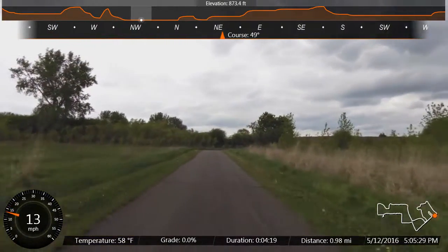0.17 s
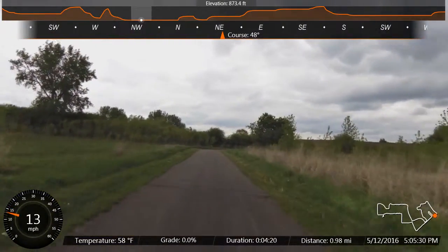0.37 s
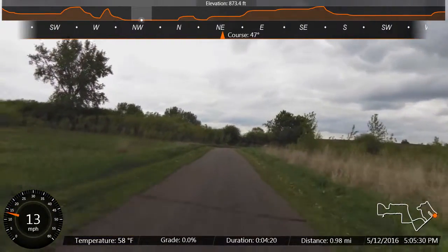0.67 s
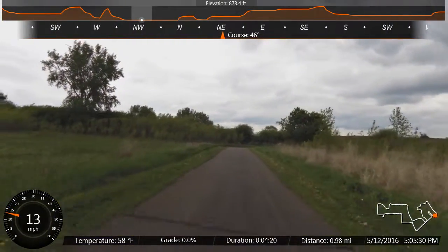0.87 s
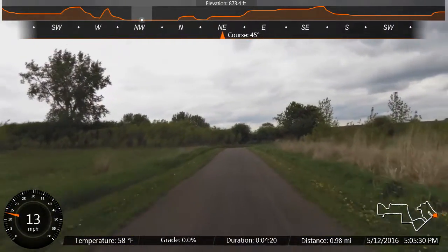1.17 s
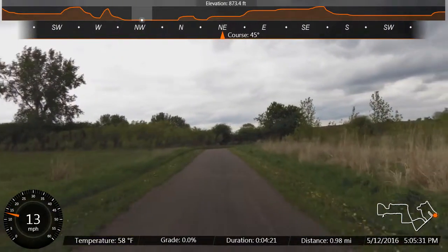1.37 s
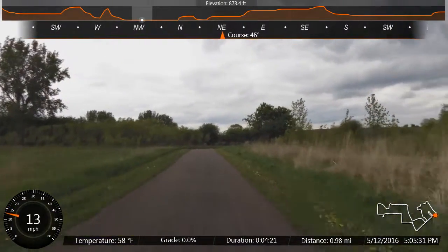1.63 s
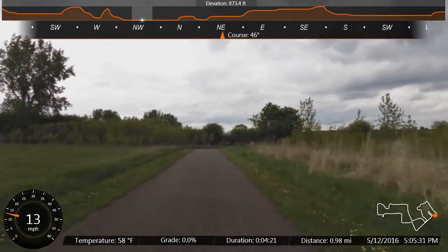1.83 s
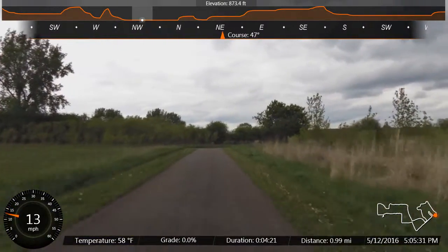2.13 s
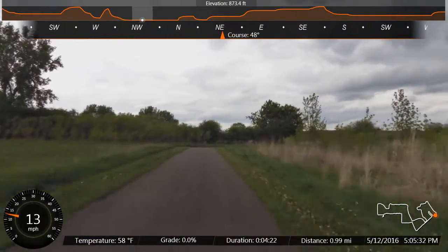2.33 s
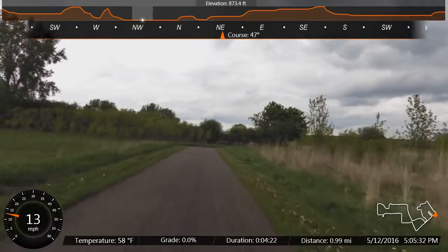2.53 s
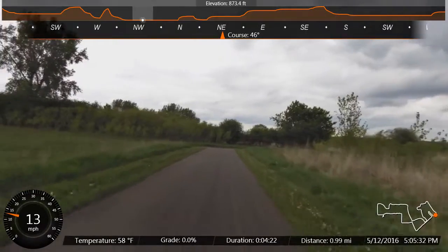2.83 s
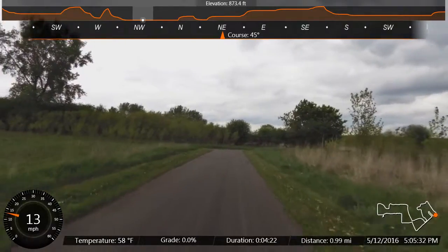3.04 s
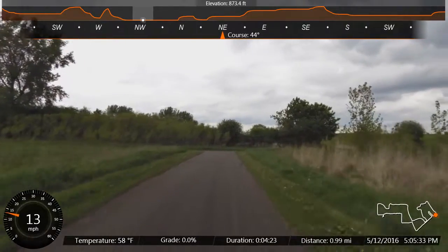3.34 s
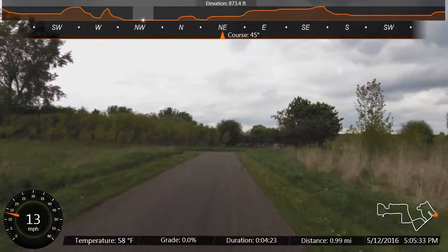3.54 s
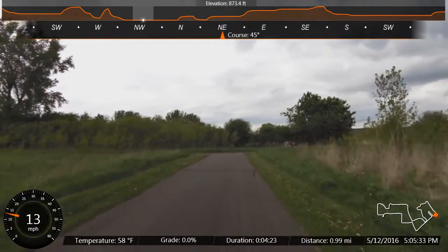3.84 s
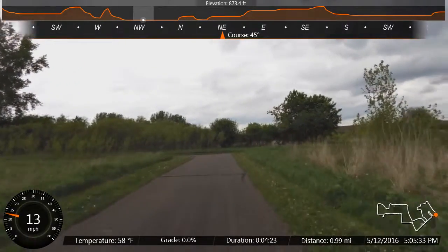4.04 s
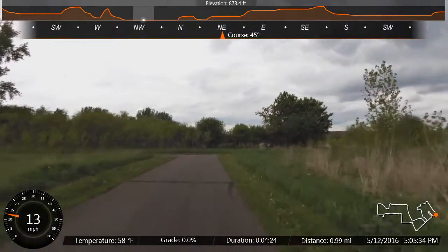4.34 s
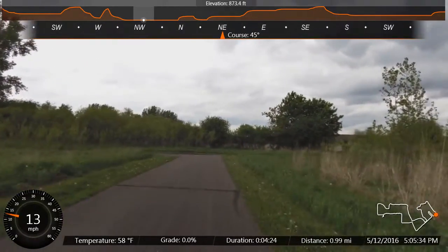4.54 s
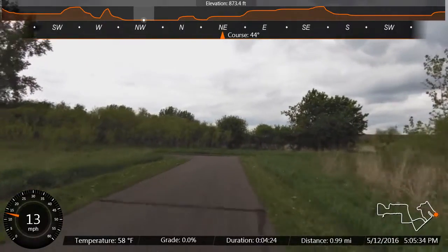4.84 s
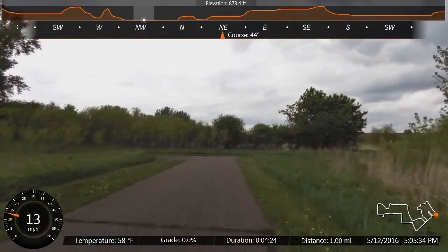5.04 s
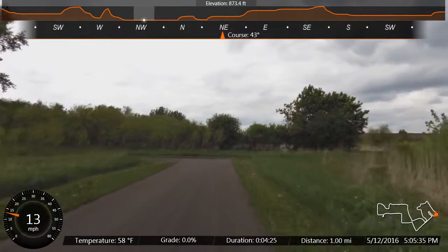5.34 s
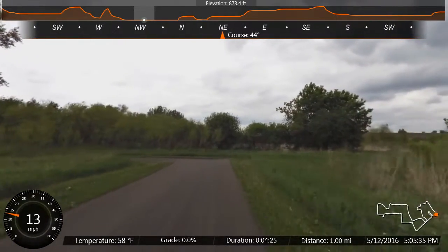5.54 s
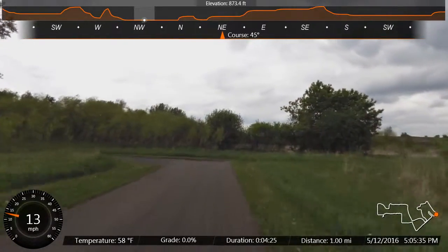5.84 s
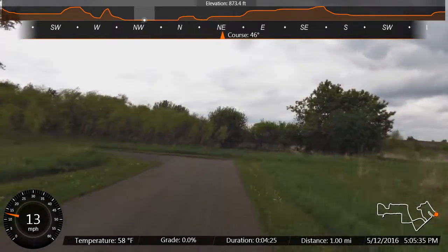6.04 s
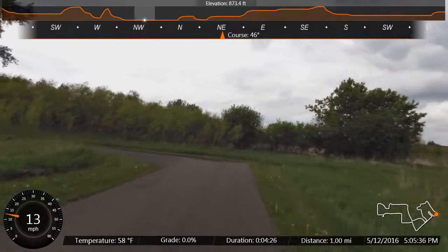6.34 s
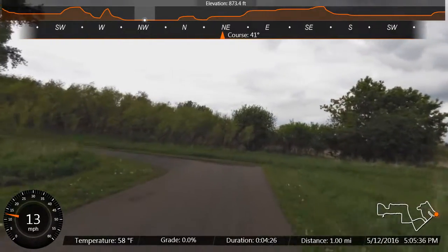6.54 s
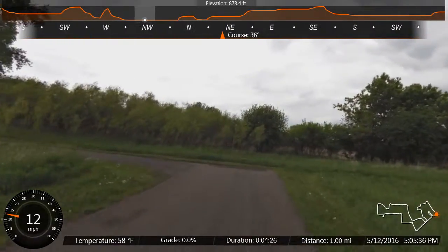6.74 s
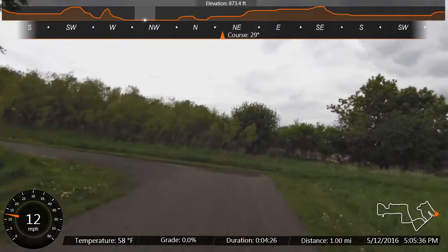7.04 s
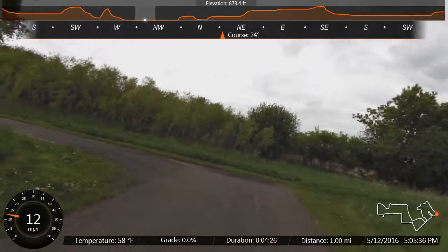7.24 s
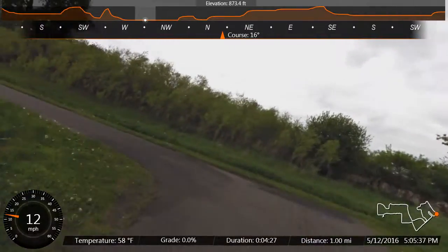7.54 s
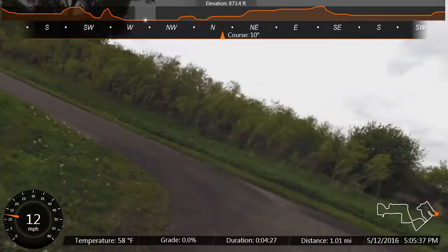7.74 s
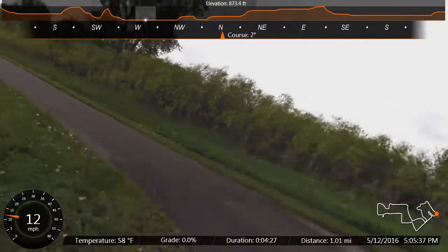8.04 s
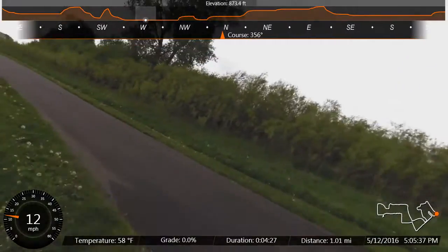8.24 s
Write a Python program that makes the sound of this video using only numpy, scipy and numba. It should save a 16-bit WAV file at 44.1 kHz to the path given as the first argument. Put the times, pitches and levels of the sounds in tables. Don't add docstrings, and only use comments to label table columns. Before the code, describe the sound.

A bicycle hums along a cracked paved path with low wind rumble, a lever clack, and violent rattling knocks as wheels hit cracks.

```python
import sys
import numpy as np
from scipy import signal
from scipy.fft import rfft, irfft
from scipy.io import wavfile
from scipy.ndimage import uniform_filter1d
from numba import njit

SR = 44100
rng = np.random.default_rng(int(sys.argv[2]) if len(sys.argv) > 2 else 0)


def master_out(mix):
    frames = np.transpose(np.atleast_2d(mix))
    ceiling = np.clip(frames, -1, 1)
    pcm = np.round(ceiling * 32767).astype(np.int16)
    wavfile.write(sys.argv[1], SR, pcm)


def gain_from_db(level_db):
    decades = np.asarray(level_db, float) / 20
    return 10 ** decades


N = 370422

# (centre [Hz], width [Hz], level [dB])
MOUNT_MODES = [(260.2, 24.5, -1.5), (288.4, 34.2, 0), (330.8, 52, -7.5)]
# (centre [Hz], width [Hz], level [dB])
BAR_MODES = [(341, 120, -6), (523, 111.6, 0), (673, 83, 1), (959, 52, -8), (1206, 128, -11.5),
             (1460, 120, -20.5)]
# (centre [Hz], width [Hz], level [dB])
FRAME_MODES = [(1240, 156, 4), (1958, 160, -0.5), (2534, 164, 0), (3348, 90, 1), (3850, 290, -12.5),
               (4940, 240, -7), (5300, 160, -11), (5764, 250, -12.5)]


@njit
def svf(x, hz, width):
    y, band, low = np.empty(len(x)), 0., 0.
    g, k = np.tan(np.pi * hz / SR), width / hz
    for i in range(len(x)):
        v = (band + g * (x[i] - low)) / (1 + g * (g + k))
        band = 2 * v - band
        low = low + 2 * g * v
        y[i] = k * v
    return y


def unit(x):
    return x / np.sqrt(np.mean(x ** 2))


def ring(x, modes):
    out = np.zeros(len(x))
    for k, (hz, width, db) in enumerate(modes):
        out += (-1) ** k * gain_from_db(db) * svf(x, float(hz), float(width))
    return out


def smooth_twice(x, size):
    return uniform_filter1d(uniform_filter1d(x, size), size)


def walk(rate):
    hold = int(SR / rate)
    held = np.repeat(rng.standard_normal(N // hold + 1), hold)[:N]
    return 1.2 * smooth_twice(held, hold)


def decay(x, seconds):
    return signal.lfilter([1], [1, -np.exp(-1 / (seconds * SR))], x)


def leaky_mean(x, seconds):
    fade = np.exp(-1 / (seconds * SR))
    return signal.lfilter([1 - fade], [1, -fade], x)


def road(hum_db, grain_db):
    grit = rng.standard_normal(N) * gain_from_db(1.64 * walk(35))
    fine_grit = 0.54 * rng.standard_normal(N) * gain_from_db(3.0 * walk(90))
    hum = unit(svf(ring(grit, MOUNT_MODES), 285., 210.))
    buzz = unit(ring(svf(grit + fine_grit, 700., 1600.), BAR_MODES))
    return gain_from_db(hum_db) * hum + gain_from_db(grain_db) * buzz


def rumble(db):
    # (frequency [Hz], level [dB per Hz])
    rumble_colour = [(12, -59), (20, -52.5), (29, -25), (40, -13), (74, -3), (178, -3.5), (199, -3),
                     (230, -1), (300, -34), (510, -120)]
    hz, shape_db = np.transpose(rumble_colour)
    f = np.maximum(np.fft.rfftfreq(N, 1 / SR), 1)
    colour = gain_from_db(np.interp(np.log(f), np.log(hz), shape_db, right=-90))
    puffs = rng.standard_normal(N) * gain_from_db(2.5 * walk(14))
    return gain_from_db(db) * unit(irfft(rfft(puffs) * colour, N))


def chain(db, grind_db):
    link_gap_s, gap_scatter = .053, .18
    link_db, link_spread_db, link_top_db = -42, 5.5, -37
    slaps_per_s, slap_db, grind_to_whirr = 70, 3, 0.69
    tail_s = 0.003

    gap_chance, level_chance = rng.standard_normal((400, 2)).T
    at = (np.cumsum(link_gap_s * np.exp(gap_scatter * gap_chance)) * SR).astype(int)
    heard = at < N
    seats = np.zeros(N)
    seats[at[heard]] = gain_from_db(np.minimum(link_db + link_spread_db * level_chance, link_top_db))[heard]

    jiggle_size = gain_from_db(2.5 * np.minimum(rng.exponential(size=N), 2.5))
    jiggle = (rng.random(N) < 150 / SR) * jiggle_size
    whirr = gain_from_db(2.0 * walk(25))
    crackle = gain_from_db(db + grind_to_whirr * grind_db) * (whirr + decay(jiggle, tail_s))
    drive = rng.standard_normal(N) * (gain_from_db(6) * crackle + gain_from_db(8.5) * decay(seats, tail_s))
    out = np.zeros(N)
    for k, mode in enumerate(FRAME_MODES):
        out += (-1) ** k * ring(drive * gain_from_db(2.8 * walk(30)), [mode])

    slap_size = gain_from_db(3.1 * rng.standard_normal(N)) * (gain_from_db(grind_db) - 1)
    slaps = (rng.random(N) < slaps_per_s / SR) * slap_size
    grains = rng.standard_normal(N) * decay(slaps, tail_s)
    return out + gain_from_db(db + 6 + slap_db) * ring(grains, FRAME_MODES)


def clatter(events, modes, dull_db, bright_db, body_db):
    split_hz = 2200
    t = np.arange(2048) / SR
    low, high, bar = np.zeros((3, N + len(t)))
    for s, db, rel_db, bar_db, ms in events:
        attack = np.minimum(t / 0.00096, 1)
        burst = gain_from_db(db) * rng.standard_normal(len(t)) * np.exp(-t * 1000 / ms) * attack
        start = int(s * SR)
        span = slice(start, start + len(t))
        low[span] += burst
        high[span] += burst * gain_from_db(rel_db)
        bar[span] += burst * gain_from_db(bar_db)
    low, high, bar = low[:N], high[:N], bar[:N]
    dull = ring(low, [m for m in modes if m[0] < split_hz]) + gain_from_db(-23.5) * svf(low, 1300., 1500.)
    bright = ring(high, [m for m in modes if m[0] >= split_hz]) + gain_from_db(-28) * svf(high, 2600., 4000.)
    return gain_from_db(dull_db) * dull + gain_from_db(bright_db) * bright + gain_from_db(body_db) * ring(bar, BAR_MODES)


def gear_lever():
    # (centre [Hz], width [Hz], level [dB])
    lever_modes = [(1140, 170, -5.5), (1180, 120, 2.5), (2050, 230, -8), (2380, 38, 2.5), (3620, 470, -5.5),
                   (3850, 91, 6.5), (4640, 1600, -0.5), (4960, 97, -9), (7450, 2500, -23.5)]
    # (time [s], peak [dB], brightness [dB], share into the bar [dB], burst [ms])
    lever_clicks = [
        (0.268, -10, -11.5, -12, 2.9),
        (0.2719, -26, -13, -21, 1.9),
        (0.332, -24.5, -5, -16, 2.3),
        (0.3842, -15, -5, -24.5, 2.5),
        (0.3868, 4, -11, -19.5, 1.5),
        (0.4173, -29, -9, -24, 1.5),
        (0.4335, -20.5, -22, -20, 1.5),
    ]
    return clatter(lever_clicks, lever_modes, 18, 10, 11)


def pings():
    # (time [s], level [dB], pitch [Hz], fall by 60 dB [s])
    ping_notes = [(.384, -11, 4780, .03), (.389, -24, 2455, .06), (.389, -27, 3790, .05),
                  (.392, -37, 5280, .13), (.27, -33, 3800, .05), (1.256, -19, 1230, .04),
                  (1.281, -14, 1200, .05), (1.768, -24, 1220, .04), (5.982, -29, 1230, .08),
                  (7.895, -46, 4900, .09), (7.897, -48, 5150, .09)]
    t = np.arange(N) / SR
    out = np.zeros(N)
    for s, db, hz, t60 in ping_notes:
        after = np.maximum(t - s, 0)
        out += gain_from_db(db) * np.sin(2 * np.pi * hz * after) * np.exp(-np.log(1000) * after / t60)
    return out


def jolts():
    # (time [s], signed push [full scale])
    jolt_pushes = [
        (.4225, 1.8),
        (1.2797, 6.5),
        (1.2832, 5.5),
        (1.5305, 1.5),
        (8.2872, 1.8),
        (8.2946, 1.6),
    ]
    push = np.zeros(N)
    for s, size in jolt_pushes:
        push[int(s * SR)] = size * 30
    return svf(smooth_twice(push, 24), 285., 43.)


def loose_parts():
    # (time [s], peak [dB], brightness [dB], burst [ms])
    rattle_events = [(0.487, -20, -14, 2.6), (0.573, -22, -7.5, 2.8), (0.6122, -11, -13, 1.9),
                     (0.6345, -18.5, 3, 2.9), (0.6432, -13, -1.5, 2.5), (0.6569, -22, -13.5, 12.5),
                     (0.6733, -25, -6, 2.8), (0.7052, -20.5, -7.5, 2.5), (0.8174, -6.5, -17, 2),
                     (0.8333, -21, -20, 2.6), (0.849, -16, -21, 1.2), (0.8753, -20.5, -14, 7.6),
                     (1.2544, -23.5, -29, 6.3), (1.2822, -3, -36, 2.9), (1.2837, -19.5, -22, 5.9),
                     (1.292, -27, -20, 2.8), (1.5424, -16, -12, 1.1), (5.69, -28, -7, 3),
                     (5.7013, -12, -15, 2), (5.7084, -18.5, -16, 4.5), (5.7498, -18.5, -8, 3.6),
                     (5.767, -23, -17, 1), (5.793, -30, -3.5, 2.3), (5.8974, -10.5, -17, 0.79),
                     (5.957, -22.5, -31, 2.5), (5.9676, -21, -17, 3.5), (8.2841, -26, -23, 6.3),
                     (8.3236, -23, -9, 6.1), (8.3549, -19.5, -13, 1.6), (8.371, -8, -22, 3.3)]
    # (time [s], peak [dB], share into the bar [dB])
    pebble_events = [(0.565, -27, -9), (0.967, -25, 13), (1.2146, -29.5, 6), (1.516, -34, 19),
                     (1.71, -42, 11), (1.7232, -32, 14), (1.8398, -50, 17), (1.88, -33.5, 9),
                     (1.93, -29, 5), (2.2912, -28.5, 13), (2.6942, -29.5, 11), (2.959, -40, 18),
                     (3.0645, -17.5, -4), (3.517, -35, 26), (3.764, -32, 14), (3.913, -43, 19),
                     (4.8626, -25, 10), (4.9424, -48, 24), (5.807, -39, 2), (5.915, -17, 0),
                     (6.0387, -32, 13), (6.076, -34, -7), (6.125, -29, 13.5), (6.153, -26.5, 4),
                     (6.5172, -30.5, -3), (7.4524, -27.5, 1), (7.6984, -32.5, 1), (7.76, -35, 11),
                     (8.3317, -22, 3), (8.3848, -21, 1)]
    bar_at_db, bar_slope = -24, -0.7
    pebble_bright_db, pebble_ms = -10.5, 2.5
    events = []
    for s, db, bright_db, ms in rattle_events:
        events.append((s, db, bright_db, bar_slope * (db - bar_at_db), ms))
    for s, db, bar_db in pebble_events:
        events.append((s, db, pebble_bright_db, bar_db, pebble_ms))
    return clatter(events, FRAME_MODES, 10.1, 18.1, 4.6)


def slams():
    # (time [s], signed push [full scale], swing [Hz], edge [ms])
    crack_slams = [(0.6105, 1, 330, 0.81), (0.6154, 0.55, 305, 0.29), (0.6233, 1.5, 62, 0.11),
                   (0.63, 0.64, 121.7, 0.072), (0.631, -1, 69, 0.054), (0.6371, 2.6, 130, 0.17),
                   (0.6434, -0.34, 130, 0.77), (0.8108, 0.8, 90, 0.056), (0.8147, -1.46, 110, 0.4),
                   (0.8192, 0.8, 205, 0.24), (0.834, 1, 200, 0.48), (0.8378, 1, 55, 0.09),
                   (0.8472, .8, 89, 0.07), (.851, -0.85, 112.4, 0.06), (5.704, .8, 310, 0.18),
                   (5.7077, 1.2, 202, 0.21), (5.7187, 2.5, 130, 0.096), (5.7244, -1.5, 69.3, 0.057),
                   (5.7298, 0.15, 222.4, 0.035), (5.7323, 1.6, 92.2, 0.055), (5.7378, 1.3, 75, 0.065),
                   (5.7594, 1.5, 130, 0.42), (5.906, 0.5, 68.1, 0.051), (5.909, -1.05, 79, 0.034),
                   (5.9134, 0.6, 250, 0.24), (5.9312, 1.5, 61.3, .09), (5.9423, 0.33, 79, 0.03),
                   (5.9448, -0.8, 118, 0.05), (8.3696, 0.9, 192, 0.077), (8.3765, 1.4, 178, 0.28)]
    # (time [s], signed push [full scale], swing [Hz],
    # edge [ms])
    clamp_knocks = [
        (1.2773, 0.91, 500, 0.17),
        (1.2803, -0.5, 495, 0.052),
        (1.2842, -0.96, 454, 0.078),
        (1.545, 0.89, 182, 0.19),
        (5.7957, 1.06, 168, 0.25),
        (8.3271, 1.24, 243, 0.27),
        (8.3724, 1.3, 304, 0.13),
        (8.3955, 1.1, 194, 0.07),
    ]
    recoil_up_ms, recoil_down_ms = 1.3, .4
    lead = 512
    t = np.arange(-lead, 3584) / SR
    ms = t * 1000
    out = np.zeros(N + 4096)
    for s, push, hz, edge_ms in list(crack_slams) + list(clamp_knocks):
        recoil_ms = recoil_up_ms if push > 0 else recoil_down_ms
        snap = .5 + .5 * np.tanh(ms / edge_ms)
        onset = .5 + .5 * np.tanh((ms + recoil_ms) / (2 * edge_ms))
        recoil = -.7 * onset * (1 - snap) * np.exp(-np.clip(1 + ms / recoil_ms, 0, 1))
        swing = snap * np.cos(2 * np.pi * hz * t) * np.exp(-1.9 * hz * np.maximum(t, 0))
        start = int(s * SR) - lead
        out[start:start + len(t)] += push * (recoil + swing)
    return out[:N]


def shudder(blows):
    shake = np.sqrt(leaky_mean(blows ** 2, 0.0039)) * gain_from_db(5.9 * walk(300))
    grit = shake * rng.standard_normal(N)
    return gain_from_db(-1) * ring(grit, BAR_MODES) + gain_from_db(-23.5) * ring(grit, FRAME_MODES)


def steady_ride():
    # (time [s], road shake at the mount [dB], wind gust [dB])
    ride_course = [(0.0, -21.5, -31), (0.4, -22.5, -36.5), (0.75, -19, -33), (1.4, -21, -38),
                   (1.57, -23, -31), (2.1, -22, -39.5), (2.69, -23.5, -37), (2.92, -22.5, -37),
                   (4.14, -25, -35.5), (4.52, -24, -44), (4.96, -23.5, -36.5), (5.17, -22, -27),
                   (5.47, -25, -36), (5.92, -22.5, -32.5), (6.34, -20, -38), (7.23, -22.5, -35),
                   (8.12, -21, -31.5), (8.4, -22, -23.5)]
    # (time [s], attack [s], release [s], rise [dB])
    grind_spells = [
        (0.50, 0.071, .35, 16.5),
        (4.82, 0.2, .12, 3.5),
        (8.31, 0.077, 0.33, 16),
    ]
    hum_db, gust_gain_db, calm_grain_db, calm_chain_db = 2, 3, -34.5, -54.5
    calm_shake_db, grain_follows, chain_follows, grind_to_grain = -23.5, 0.1, 0.18, 0.17
    t = np.arange(N) / SR
    s, shakes, gusts = np.transpose(ride_course)
    shake_db = np.interp(t, s, shakes)
    gust_db = np.interp(t, s, gusts)
    grind_db = np.zeros(N)
    for at, rise, fall, db in grind_spells:
        grind_db += db * np.exp(-np.maximum((at - t) / rise, (t - at) / fall))
    rougher_db = shake_db - calm_shake_db
    grain_db = calm_grain_db + grain_follows * rougher_db + grind_to_grain * grind_db
    chain_db = calm_chain_db + chain_follows * rougher_db
    return road(shake_db + hum_db, grain_db) + rumble(gust_db + gust_gain_db) + chain(chain_db, grind_db)


def scene():
    ride = steady_ride()
    parts = gear_lever() + pings() + loose_parts()
    blows = slams()
    parts = parts + shudder(blows)
    duck_db, duck_s = -17.5, 0.062
    ducking = 1 + leaky_mean(blows ** 2, duck_s) / gain_from_db(duck_db)
    muffled = signal.sosfilt(signal.ellip(5, 1, 60, 6700, fs=SR, output="sos"), ride) / ducking
    parts = signal.sosfilt(signal.butter(7, 6200, fs=SR, output="sos"), parts)
    mount_ring = gain_from_db(-16.5) * ring(blows, MOUNT_MODES)
    return (muffled + parts + blows + jolts() + mount_ring)[None]


def roll_off(x):
    return signal.sosfilt(signal.butter(12, 15800, fs=SR, output="sos"), x)


def record(dry):
    ceiling = .73
    thin = signal.sosfilt(signal.butter(2, 36, "high", fs=SR, output="sos"), dry) / ceiling
    capped = ceiling * thin / (1 + np.abs(thin) ** 8) ** (1 / 8)
    return roll_off(capped)


dry = scene()
out = record(dry)
master_out(out)
```